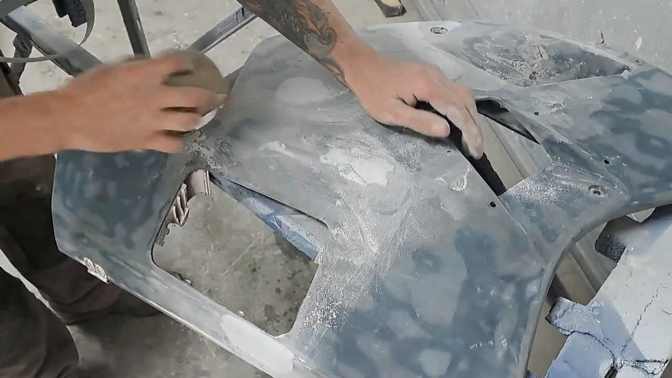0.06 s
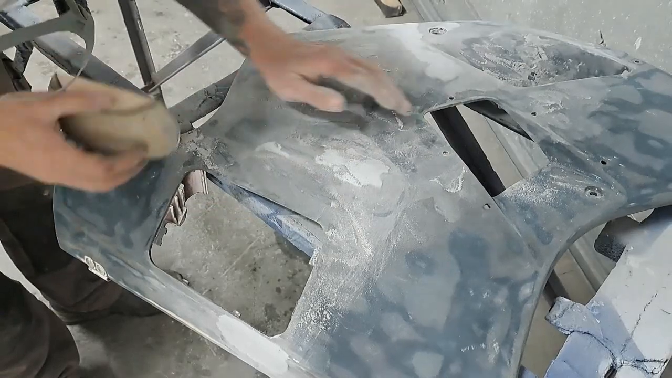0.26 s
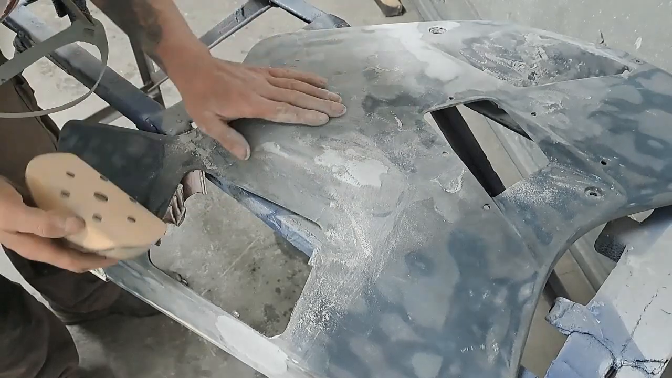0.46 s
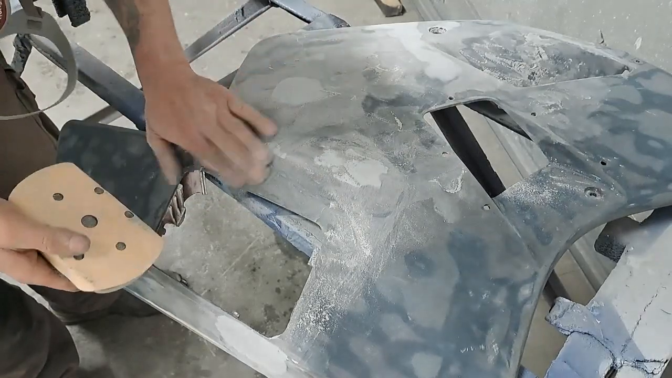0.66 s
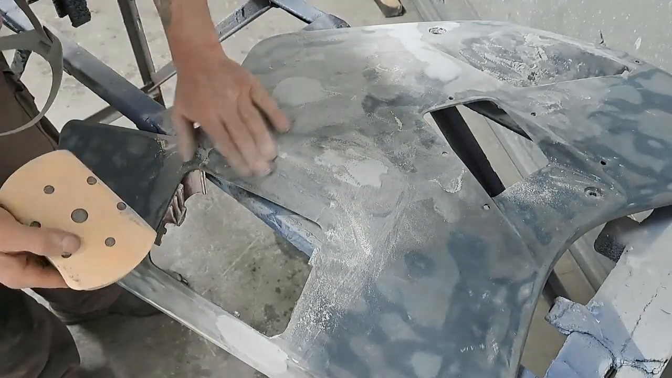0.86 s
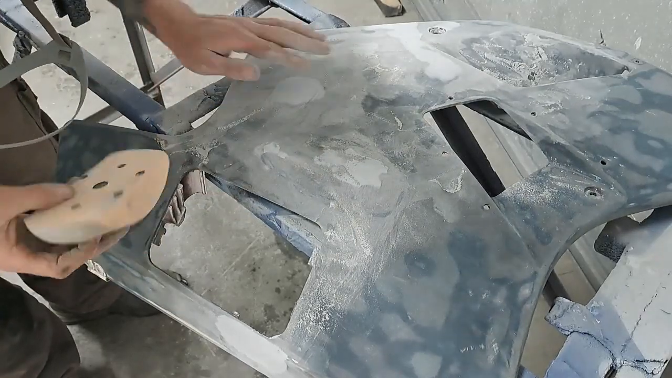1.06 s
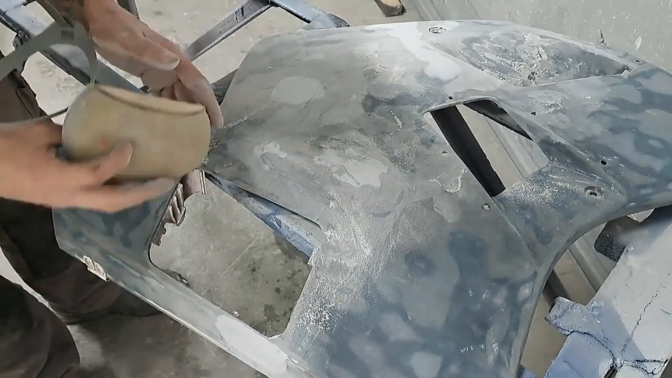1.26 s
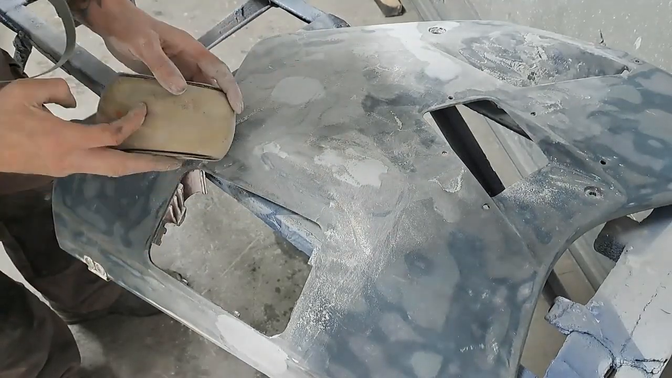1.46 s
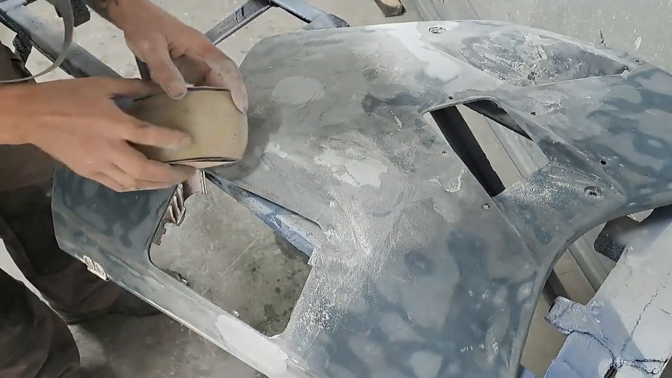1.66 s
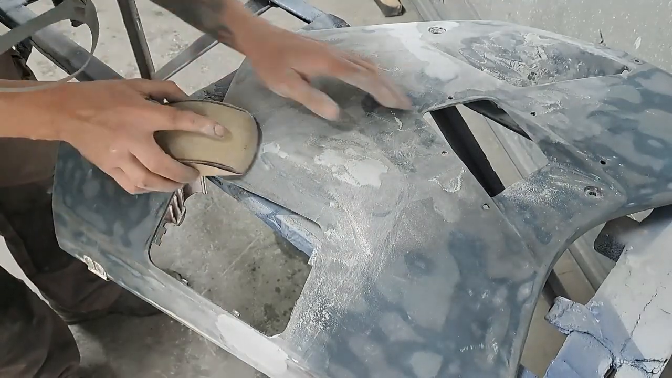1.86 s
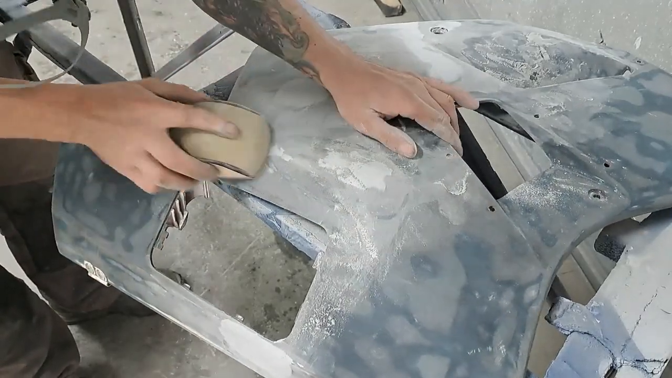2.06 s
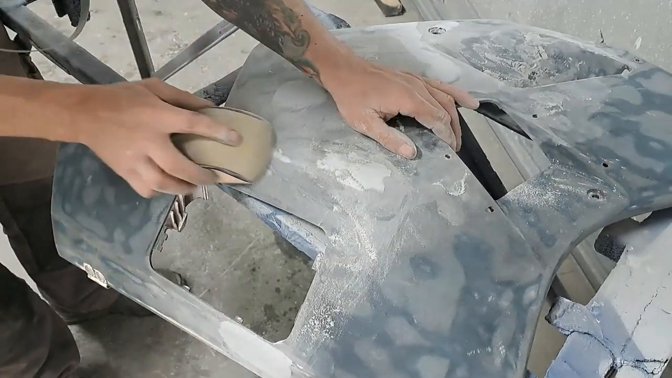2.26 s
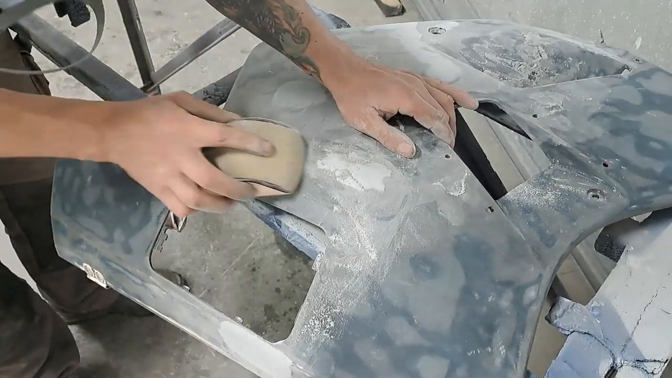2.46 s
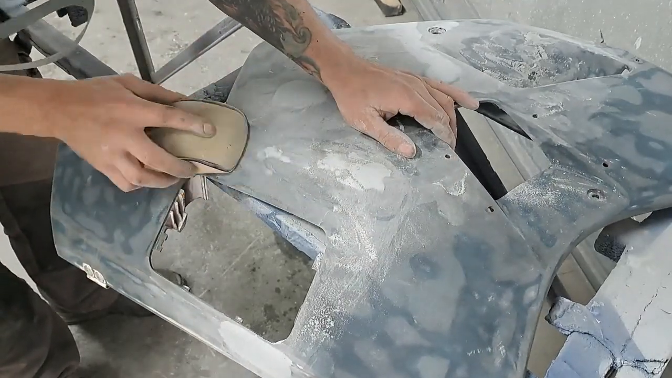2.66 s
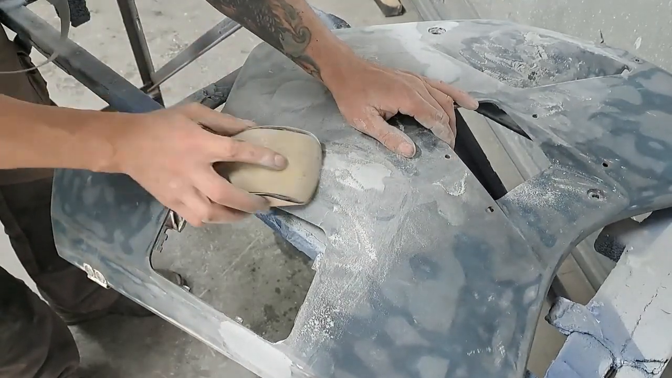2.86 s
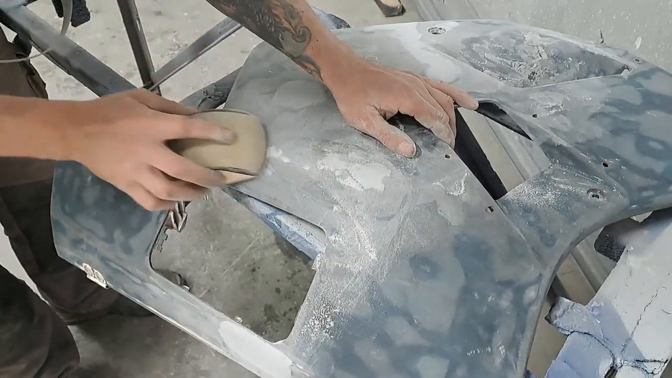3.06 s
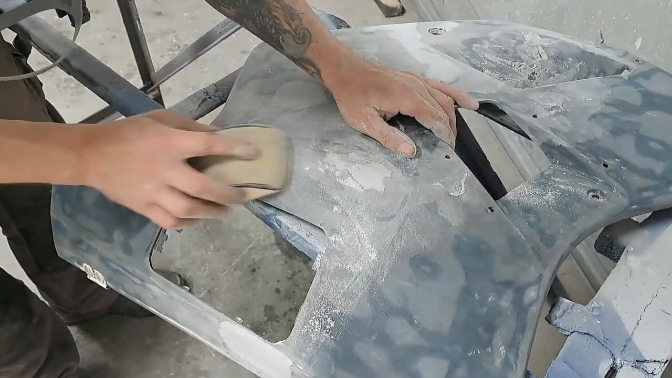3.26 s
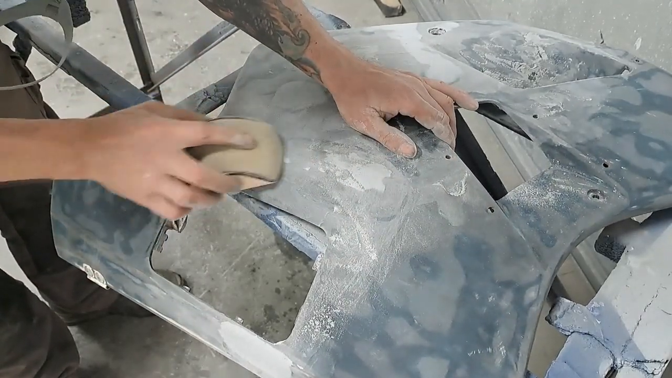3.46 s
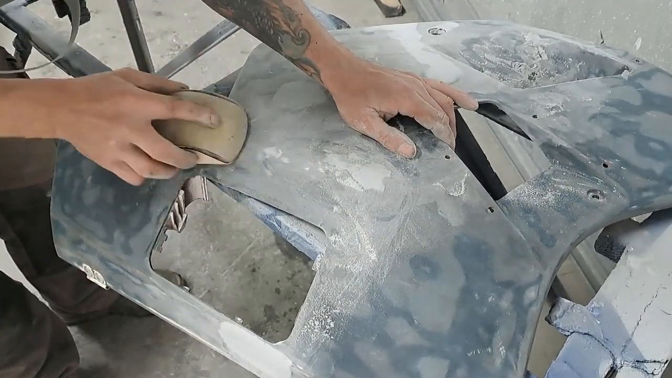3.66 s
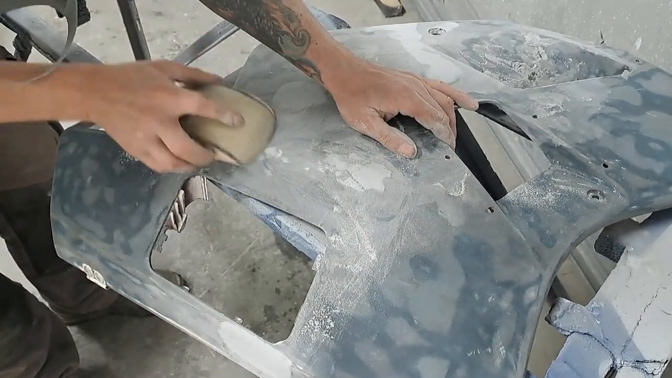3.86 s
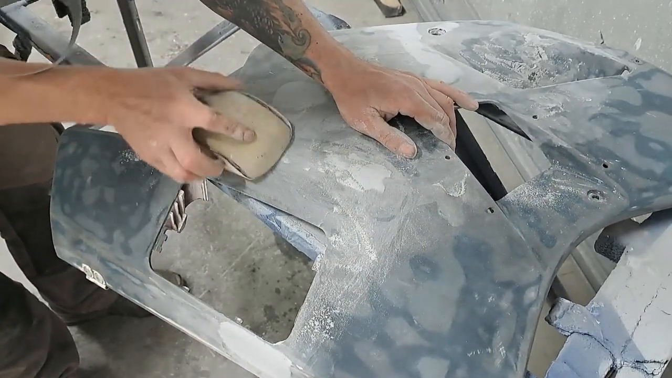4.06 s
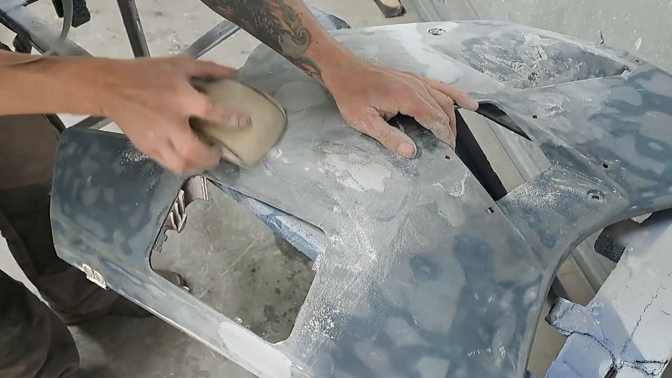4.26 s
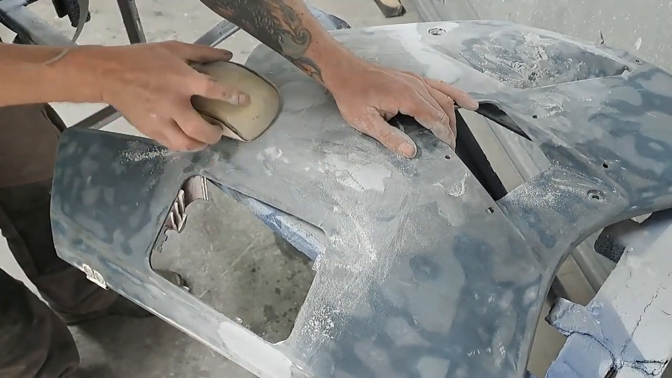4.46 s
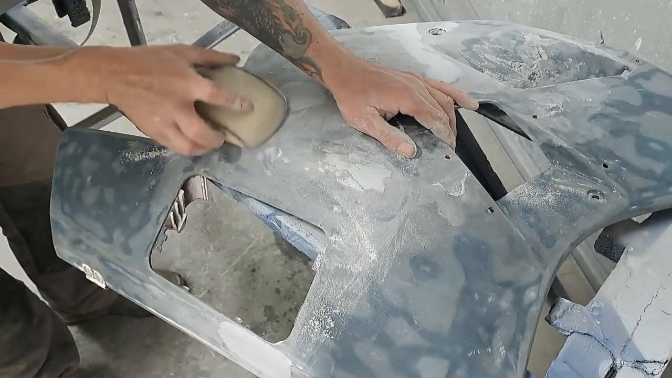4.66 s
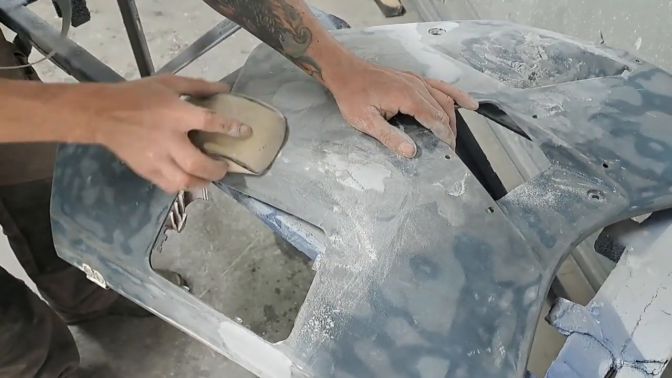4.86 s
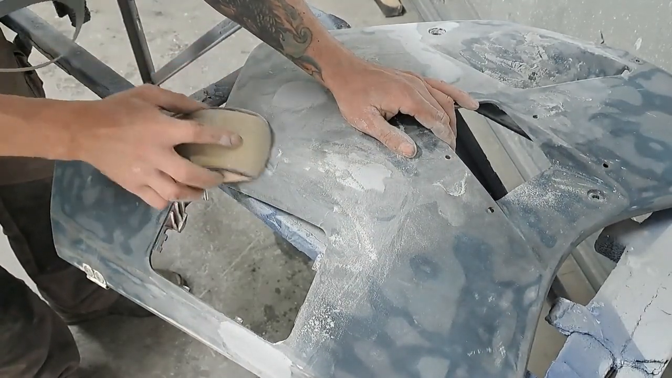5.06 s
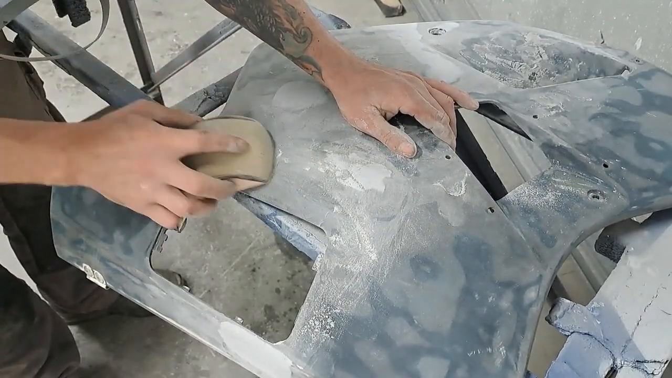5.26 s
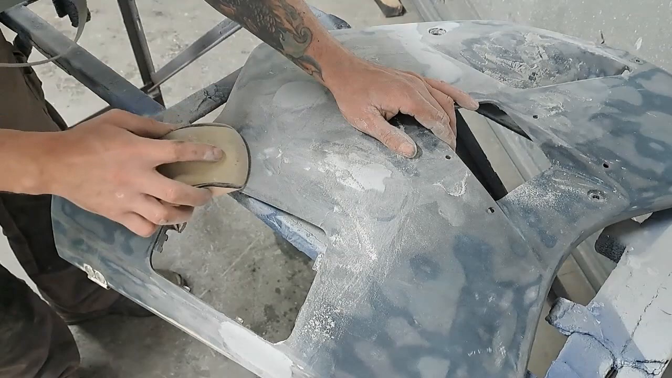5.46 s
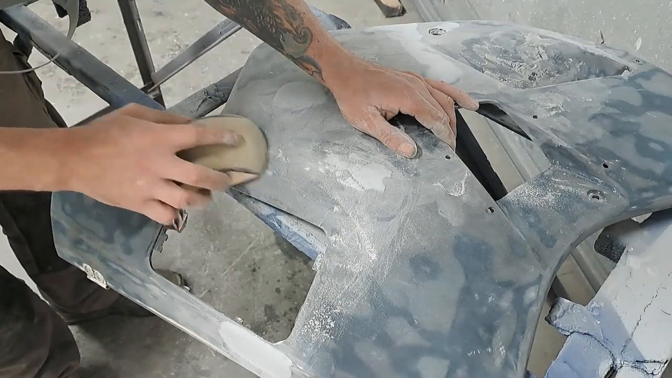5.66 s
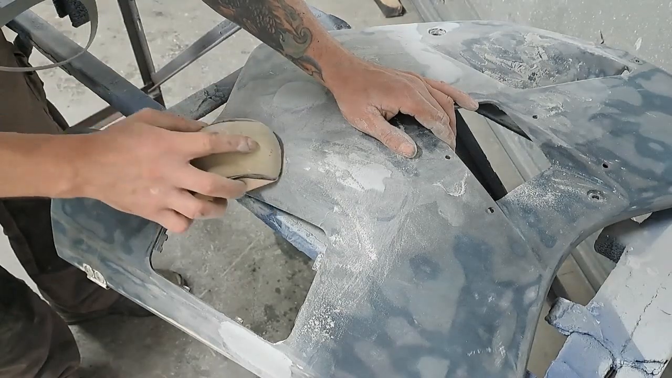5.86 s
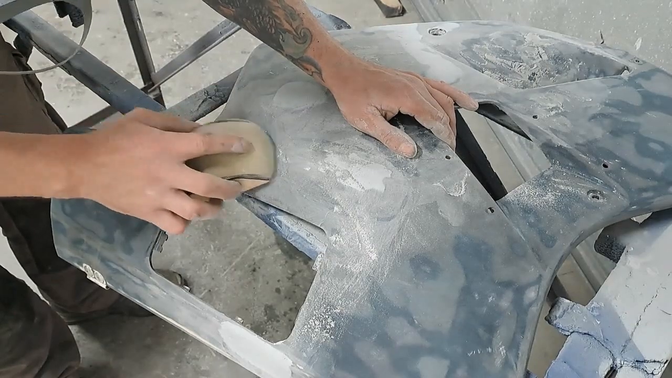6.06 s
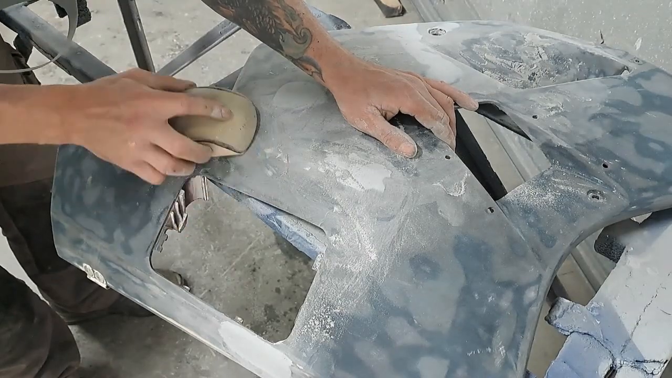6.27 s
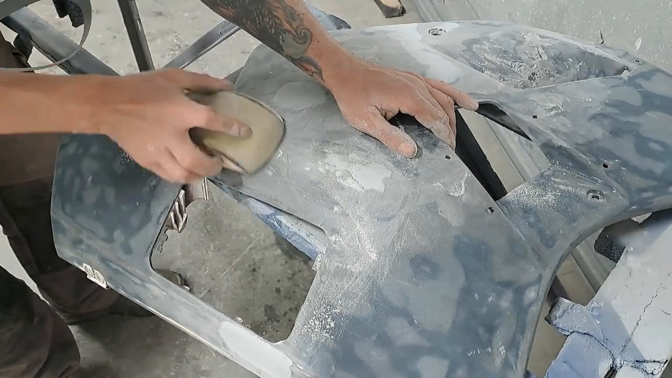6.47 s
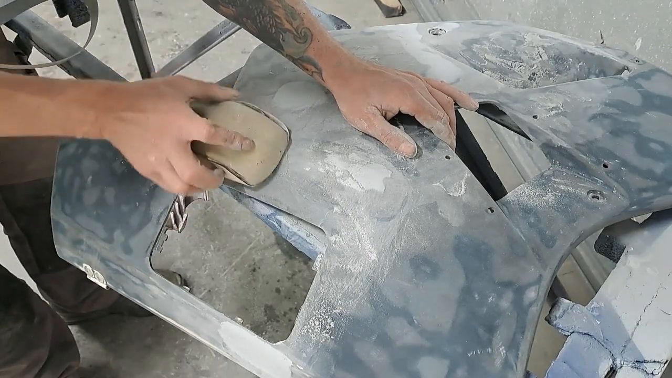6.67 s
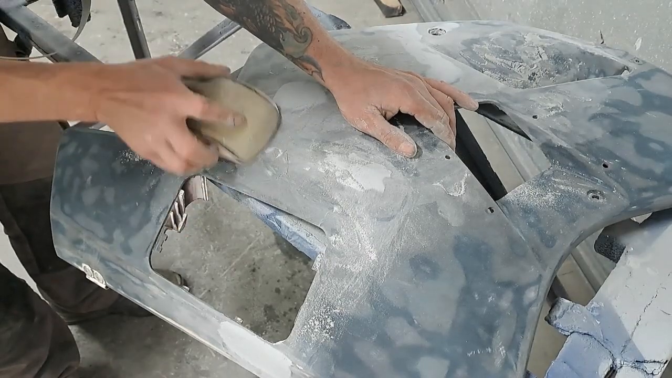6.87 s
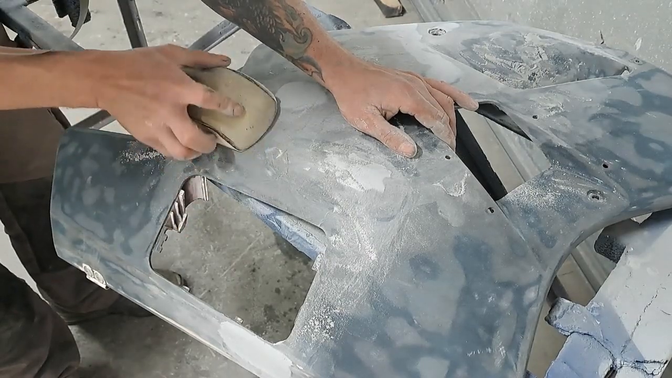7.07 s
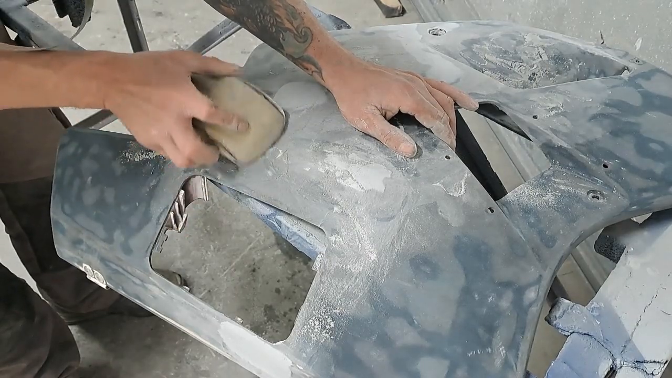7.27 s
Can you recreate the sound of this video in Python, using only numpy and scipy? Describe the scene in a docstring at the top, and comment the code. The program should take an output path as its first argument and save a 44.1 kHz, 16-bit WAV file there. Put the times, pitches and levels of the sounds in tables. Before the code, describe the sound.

A hand swishes across a dusty plastic bumper right at the start, followed by softer wipes up to about 1 second, with faint low bumps from the hollow part. Between 1.2 and 2 seconds, fingers make small dry scuffs on sandpaper and slide quietly into place. At about 2.1 seconds a padded sanding block lands with a dull, hollow thud and immediately begins rubbing back and forth, roughly seven strokes a second. The grit makes a bright, scratchy hiss that swells with each stroke and dulls at each turn. Around 5 seconds the sanding briefly eases with a soft bump, continues a little lighter, and grows stronger again from about 6.3 seconds, running on to the end just past 7 seconds. Underneath, the part rumbles and thumps softly on its stand. The sound is close and in stereo, in a quiet workshop with little echo.

```python
"""Sanding a plastic bumper.

A hand wipes off dust, sets down a padded block and sands at about seven strokes a second.
Grit scratches merge into a hiss that brightens as the block speeds up and dulls at each turn.
The hollow part rumbles on its stand and thuds as hand or block lands. Two close mics, quiet workshop."""
import sys
import numpy as np
from scipy import signal
from scipy.fft import rfft, irfft, next_fast_len
from scipy.io import wavfile
from scipy.ndimage import uniform_filter1d

SR = 44100
rng = np.random.default_rng(int(sys.argv[2]) if len(sys.argv) > 2 else 0)


def file_out(sig):
    """Save sig as 16-bit WAV at sys.argv[1]."""
    # one column per channel
    cols = np.atleast_2d(sig).T
    # limit, then scale
    lim = np.clip(cols, -1, 1)
    pcm = np.round(lim * 32767).astype(np.int16)
    wavfile.write(sys.argv[1], SR, pcm)


N = 322365
TIME_S = np.arange(N) / SR


def amp(db):
    return 10 ** (np.asarray(db) / 20)


def unit_rms(x):
    return x / np.sqrt(np.mean(x ** 2) + 1e-20)


def over_hz(table, hz):
    """Table columns interpolated over log frequency."""
    table_hz, *columns = np.transpose(table)
    return np.array([np.interp(np.log(hz + 1), np.log(table_hz + 1), c) for c in columns])


def add(mix, start_s, sound):
    """Mix a sound in at start_s."""
    part = mix[:, round(start_s * SR):][:, :sound.shape[-1]]
    part += sound[..., :part.shape[-1]]


def resonance(f, hz, width_hz):
    """Response of one damped mode."""
    return 1 / (1 + 1j * (f ** 2 - hz ** 2) / (width_hz * (f + 1)))


def swell_db(t, start_s, hold_s, rise_s, fade_s):
    """Rise, hold and fade, relative to the peak; rise_s and fade_s are per 10 dB."""
    return -10 * np.maximum(np.maximum((start_s - t) / rise_s, (t - start_s - hold_s) / fade_s), 0)


def block_contact(landing_s=2.105, settle_s=0.012):
    """Ramp from 0 to 1 as the block settles on the part."""
    return np.clip((TIME_S - landing_s) / settle_s + .5, 0, 1)


def reflect(x, wet_db, t60_s):
    """Dense reflections off bench and walls, different at each mic."""
    t = np.arange(SR // 3) / SR
    tail = rng.standard_normal((2, len(t))) * amp(-60 * t / t60_s) * (t > .002)
    tail *= amp(wet_db) / np.linalg.norm(tail, axis=1, keepdims=True)
    return (x + signal.fftconvolve(x, tail, axes=1)[:, :N]) / np.sqrt(1 + amp(wet_db) ** 2)


# Likeness of the two mics: (frequency [Hz], coherence [-1..1])
MIC_COHERENCE = [(60, 0.83), (250, 0.79), (640, 0.53), (1400, 0.22), (3000, -0.045), (15000, 0.16)]

def noise(gain):
    """Unit-rms stereo noise with spectrum gain(hz), alike at both mics in the bass."""
    size = next_fast_len(N)
    hz = np.fft.rfftfreq(size, 1 / SR)
    left, independent = rfft(rng.standard_normal((2, size)))
    coherence = np.clip(over_hz(MIC_COHERENCE, hz)[0], -1, 1)
    right = coherence * left + np.sqrt(1 - coherence ** 2) * independent
    return unit_rms(irfft(np.array([left, right]) * gain(hz), size)[:, :N])


# Room tone: (frequency [Hz], gain [dB])
AIR_SPECTRUM = [(20, -23), (55, 6.5), (100, -20), (210, -9.5), (320, -15), (600, -19), (1500, -29),
                (5000, -33), (15000, -31)]

def workshop():
    """Still room air."""
    return amp(-71.5) * noise(lambda f: amp(over_hz(AIR_SPECTRUM, f)))


def swing(modes):
    """Low modes swinging at random, held near unit rms."""
    motion = noise(lambda f: sum(amp(db) * abs(resonance(f, hz, width)) ** 2 for hz, width, db in modes))
    return motion / np.sqrt(uniform_filter1d((motion ** 2).mean(0), size=2600))


# Part rocking on its stand: (frequency [Hz], width [Hz], gain [dB])
ROCKING_MODES = [(56, 25, 0), (76, 22, -8)]
# Panel bending: (frequency [Hz], width [Hz], gain [dB])
PANEL_MODES = [(106, 14, -6), (127.5, 12, 2.5), (177, 18, -12), (209, 22, -10)]
# Shaking from block drag, less as the hand eases off: (time [s], level [dB])
DRAG_LEVELS = [(2.1, -63), (3.6, -63), (4.4, -66), (5.3, -69), (6.5, -72), (7.3, -67)]
# Give under a lean or hard turn: (time [s], hold [s], rocking [dB], panel [dB])
PART_FLEXES = [(.06, .06, -52, -53), (.38, .1, -54, -55), (.8, .1, -56, -55), (.96, .08, -53, -57),
               (1.1, .2, -73, -70), (1.66, .06, -67, -66), (1.87, .05, -59, -57), (2.125, .07, -43, -54),
               (2.22, .05, -56, -55), (2.35, .06, -55, -54), (2.5, .03, -55, -61), (2.6, .05, -55, -58),
               (3.04, .09, -51, -50), (3.27, .05, -60, -53), (3.37, .03, -54, -56), (3.44, .1, -58, -54),
               (3.86, .04, -56, -61), (3.97, .19, -58, -58), (4.4, .03, -63, -55), (4.55, .04, -61, -61),
               (4.66, .03, -68, -56), (4.78, .03, -62, -56), (4.99, .06, -60, -50), (5.1, 0.1, -59, -56),
               (5.41, .1, -61, -57), (5.7, .03, -58, -54), (5.84, .03, -59, -62), (5.94, .08, -57, -60),
               (6.36, .04, -63, -67), (6.75, .05, -56, -55), (6.95, .14, -63, -60), (7.17, .1, -63, -58)]

def rumble(rocking_drag_db, panel_drag_db):
    """Each flex rocks the part and bends its panel; block drag keeps both stirring."""
    drag = amp(np.interp(TIME_S, *np.transpose(DRAG_LEVELS))) * block_contact()
    rocking, panel = drag * amp(rocking_drag_db), drag * amp(panel_drag_db)
    for start_s, hold_s, rocking_db, panel_db in PART_FLEXES:
        push = amp(swell_db(TIME_S, start_s, hold_s, rise_s=0.025, fade_s=0.055))
        rocking = np.maximum(rocking, push * amp(rocking_db))
        panel = np.maximum(panel, push * amp(panel_db))
    return (rocking * swing(ROCKING_MODES) + panel * swing(PANEL_MODES)) * amp([[-2.3], [.7]])


# Plastic shell: (frequency [Hz], gain [dB], t60 [s])
SHELL_MODES = [(53, -20, 0.3), (78, -6.5, 0.15), (107, -0.5, 0.2), (174, -2.5, 0.2), (210, -2, 0.2),
               (250, -5, 0.18), (304, -5.5, 0.21), (360, -10, 0.35), (408, 2, 0.2), (455, -5, 0.33),
               (514, 3.5, 0.1), (579, 4.5, 0.085), (640, 1.5, 0.15), (721, 1, 0.17), (825, -2, 0.2),
               (888, -1, 0.18), (976, 8.5, 0.047), (1100, -9, 0.08), (1345, 12, 0.03)]
# Hand and block landing: (time [s], level [dB], cutoff [Hz])
BLOWS = [(.356, -42.5, 430), (0.38, -39.5, 330), (0.42, -41, 180), (.798, -44.5, 290), (.849, -47, 150),
         (1.872, -48, 220), (1.895, -49.5, 240), (2.107, -22.5, 530), (2.126, -31.5, 400),
         (2.143, -27.5, 150), (2.16, -33, 700), (2.183, -37, 280), (3.049, -40, 270), (3.435, -43, 270),
         (3.521, -46, 250), (4.98, -42, 290), (5.413, -49, 650)]

def knocks(push_gain, wet_db):
    """A blow gives one low push and rings the shell; softer contact excites fewer high modes."""
    out, t = np.zeros((2, N)), np.arange(SR // 2) / SR
    for start_s, db, cutoff_hz in BLOWS:
        ring = np.zeros_like(t)
        for k, (hz, mode_db, t60_s) in enumerate(SHELL_MODES):
            mode = amp(mode_db - 60 * t / t60_s) * np.sin(2 * np.pi * hz * t)
            ring += (-1) ** k * mode / np.hypot(1, (hz / cutoff_hz) ** 2)
        phase = 2 * np.pi * cutoff_hz * t
        push = phase ** 2 * (1 - phase / np.pi) * np.exp(-phase)
        add(out, start_s, amp(db) * (ring / abs(ring).max() + push_gain * push / push.max()))
    return reflect(out, wet_db, t60_s=0.25) * amp([[-1], [1]])


def shell_rasp(base_db, growth, highpass_hz):
    """Scraping drives the shell modes: a hollow undertone that swells slightly with speed."""
    def response(f):
        modes = sum((-1) ** k * amp(db) * resonance(f, hz, np.log(1000) / (np.pi * t60_s))
                    for k, (hz, db, t60_s) in enumerate(SHELL_MODES))
        return modes * f ** 3 / (f ** 3 + highpass_hz ** 3)  # fine grit barely moves the low modes
    drive_db, _ = stroke_motion(TIME_S)
    contact = block_contact()
    excess_db = drive_db - np.average(drive_db, weights=contact)
    return noise(response) * amp(base_db + growth * excess_db) * contact


# Fingers catching the paper: (time [s], level [dB], t60 [s])
PAPER_CATCHES = [(1.208, -64, .04), (1.291, -61.5, .09), (1.354, -53.5, 0.08), (1.703, -54, .16),
                 (1.897, -54, .09)]

def paper_ticks():
    """Short dry scuffs of the paper's edge."""
    envelope, t = np.zeros((1, N)), np.arange(SR // 4) / SR
    for start_s, db, t60_s in PAPER_CATCHES:
        add(envelope, start_s, amp(db - 60 * t / t60_s))
    return envelope * noise(lambda f: amp(over_hz(GRIT_SPECTRUM, f)))


# Skin and pad drags: (time [s], length [s], centre [Hz], width [Hz], level [dB])
SHORT_DRAGS = [(0.258, 0.085, 380, 450, -58), (1.735, 0.1, 700, 800, -58.5), (1.85, 0.084, 380, 450, -56),
               (2.042, 0.042, 1630, 130, -49), (2.076, .04, 700, 450, -46), (2.268, 0.055, 1940, 600, -47),
               (2.493, 0.12, 3900, 1700, -41), (4.664, 0.055, 1700, 350, -50), (4.98, .07, 550, 700, -50),
               (5.375, 0.056, 2000, 450, -50)]

def scuffs():
    """Each short drag swells and fades in one noise band."""
    out = np.zeros((2, N))
    for start_s, length_s, hz, width_hz, db in SHORT_DRAGS:
        swell = np.sin(np.pi * np.clip((TIME_S - start_s) / length_s, 0, 1))
        out += amp(db) * swell * noise(lambda f: abs(resonance(f, hz, width_hz)) ** 2)
    return out * amp([[-2], [1.5]])


# Bite, a tilt toward the treble: (frequency [Hz], gain per bite [dB/dB])
BITE_TILT = [(1500, -0.87), (5000, -0.32), (10000, 0.76), (15000, 0.99)]

def rub(motion, spectrum, growth, base_db, flutter_db, patch_db):
    """Friction hiss: motion sets level and tilt; the changing contact patch shifts the colour."""
    hiss = noise(lambda f: amp(over_hz(spectrum, f)))
    hz, t, frames = signal.stft(hiss, SR, nperseg=256, noverlap=192)
    drive_db, bite_db = motion(t)
    motion_db = over_hz(growth, hz).T * (drive_db - base_db) + over_hz(BITE_TILT, hz).T * bite_db
    flutter = unit_rms(uniform_filter1d(rng.standard_normal(len(t)), size=8))
    patches = uniform_filter1d(rng.standard_normal((len(t), len(hz))), size=48, axis=0)
    patches = unit_rms(uniform_filter1d(patches, size=8, axis=1)).T
    frames *= amp(base_db + motion_db + flutter_db * flutter + patch_db * patches)
    return signal.istft(frames, SR, nperseg=256, noverlap=192)[1][:, :N]


# Palm wipes, then fingers and pad sliding into place:
# (at speed [s], hold [s], rise [s/10 dB], fade [s/10 dB], drive [dB], bite [dB])
HAND_SWEEPS = [(.046, .052, .045, .055, -26, 5.5), (.43, .04, .055, .22, -48.5, -3.5),
               (.72, .05, .14, .065, -39, 0), (.945, .095, .047, .055, -38, 1), (1.18, .05, .1, .1, -70, 0),
               (1.356, .05, .004, .1, -57.5, -1.5), (1.45, .04, .055, .085, -49.5, -3),
               (1.78, .04, .055, .09, -51.5, -2.5), (1.965, .14, .055, .1, -42.5, -3.5)]

def wipe_motion(t, dulling_db_per_db=0.24):
    """Drive and bite [dB] of overlapping sweeps, each brightest at its fastest."""
    power, weighted_bite = 1e-12, 0
    for start_s, hold_s, rise_s, fade_s, drive_db, bite_db in HAND_SWEEPS:
        envelope_db = swell_db(t, start_s, hold_s, rise_s, fade_s)
        sweep_power = amp(drive_db + envelope_db) ** 2
        power += sweep_power
        weighted_bite += sweep_power * (bite_db + dulling_db_per_db * envelope_db)
    return 10 * np.log10(power), weighted_bite / power


# Skin on dusty plastic: (frequency [Hz], left [dB], right [dB])
SKIN_SPECTRUM = [(250, -10.5, -4.5), (580, -9, -7.5), (1000, -10, -6), (2040, -7.5, -0.5),
                 (3370, -5.5, -2.5), (4730, -5.5, 3), (7200, -3.5, 4), (8700, -2.5, -10.5),
                 (9600, -3.5, -7), (12600, -1, 1.5), (15900, -7, -7.5)]
# Growth with speed: (frequency [Hz], gain per drive [dB/dB])
SKIN_SLOPES = [(250, 0.76), (1000, 1.1), (4000, 1.014), (12000, 0.92)]

def wiping():
    """The palm sweeps dust away and the fingers settle on the paper, until the block lands."""
    hiss = rub(wipe_motion, SKIN_SPECTRUM, SKIN_SLOPES, base_db=-43, flutter_db=0.8, patch_db=1.07)
    return hiss * np.sqrt(1 - block_contact())


# Strokes, turn to turn: (turn [s], fastest [s], drive at turn [dB], drive at fastest [dB], bite [dB])
BLOCK_STROKES = [(2.079, 2.19, -40.5, -31.5, -1.5), (2.27, 2.377, -39.5, -34.0, 1),
                 (2.426, 2.521, -41.5, -31.0, -1.5), (2.619, 2.714, -37.5, -31.5, 1.0),
                 (2.765, 2.843, -40.0, -30.5, 0), (2.952, 3.039, -36.0, -26.5, 1),
                 (3.105, 3.179, -35.0, -28.5, 1.0), (3.291, 3.395, -38.0, -28.0, 0.5),
                 (3.466, 3.52, -38.0, -30.0, 1.0), (3.613, 3.693, -42.0, -35.5, 1.0),
                 (3.755, 3.809, -42.5, -34.0, 0.5), (3.893, 3.974, -42.0, -32.0, 0.0),
                 (4.02, 4.078, -38.0, -30.0, 0.5), (4.174, 4.239, -41.5, -33.5, 1),
                 (4.288, 4.342, -40.0, -30.5, 0.0), (4.44, 4.493, -40.0, -33.5, 1.0),
                 (4.547, 4.595, -40.0, -31.0, 1.5), (4.694, 4.761, -39.5, -33.0, -0.5),
                 (4.791, 4.85, -38.0, -29.5, 1.5), (4.958, 4.992, -47.5, -41.0, 0.0),
                 (5.099, 5.178, -51.5, -37.5, 2.5), (5.26, 5.339, -46.5, -35.5, 0.5),
                 (5.41, 5.46, -43.0, -36.5, 1.5), (5.542, 5.623, -45.0, -33.0, -2.0),
                 (5.697, 5.755, -39.5, -36.5, -0.5), (5.817, 5.894, -44.0, -37.0, -1.0),
                 (5.95, 6.022, -45.0, -39.0, 0.0), (6.079, 6.132, -47.5, -37.5, 0.5),
                 (6.242, 6.327, -46.5, -33.5, 0.5), (6.371, 6.427, -39.0, -30.0, 0.5),
                 (6.524, 6.598, -41.0, -35.0, 0.0), (6.641, 6.684, -41.0, -30.0, 2),
                 (6.79, 6.852, -40.0, -35.0, 0.0), (6.9, 6.96, -41.5, -33.0, 0.5),
                 (7.039, 7.115, -41.0, -37, -0.5), (7.16, 7.217, -44.0, -35.0, -0.5)]

def stroke_motion(t, last_turn_s=7.31, grip_exponent=1.9, glide_exponent=2.2, grip_bite_db=0.6):
    """Drive and bite [dB] of the block: grit bites while speeding up, glides while slowing."""
    turn_s, fastest_s, turn_db, fastest_db, bite_db = np.transpose(BLOCK_STROKES)
    marks_s = np.append(np.column_stack([turn_s, fastest_s]), last_turn_s)
    phase = np.interp(t, marks_s, np.arange(len(marks_s)) * np.pi / 2)
    speed, acceleration = abs(np.sin(phase)), np.sin(2 * phase)
    blend = speed ** np.where(acceleration > 0, grip_exponent, glide_exponent)
    slow, fast = amp(np.interp(t, turn_s, turn_db)), amp(np.interp(t, fastest_s, fastest_db))
    drive = (1 - blend) * slow + blend * fast
    return 20 * np.log10(drive), np.interp(t, fastest_s, bite_db) + grip_bite_db * acceleration


# Grit on plastic: (frequency [Hz], left [dB], right [dB])
GRIT_SPECTRUM = [(237, -19.5, -17), (590, -12, -10), (970, -17, -12), (1340, -12, -8), (2020, -9, -2.5),
                 (3330, -11, -7.5), (5060, -10, -1.5), (6070, -12.5, -3.5), (6820, -9, -0.2),
                 (7450, -8.5, -4.5), (8900, -10.5, -20.5), (9500, -10.5, -15), (12550, -9, -7.5),
                 (16600, -16.5, -17)]
# Fine scratches grow fastest with speed: (frequency [Hz], gain per drive [dB/dB])
GRIT_SLOPES = [(250, 0.09), (1000, 0.51), (3000, 0.65), (7000, 1.05), (12000, 1.31)]

def sanding():
    """The block drags its grit back and forth; speed lifts the treble most."""
    hiss = rub(stroke_motion, GRIT_SPECTRUM, GRIT_SLOPES, base_db=-36, flutter_db=0.85, patch_db=1)
    return hiss * np.sqrt(block_contact())


def scene():
    """Friction with reflections, the part's rumble and thuds, room tone."""
    friction = sanding() + wiping() + paper_ticks() + scuffs()
    friction += shell_rasp(base_db=-59.7, growth=0.26, highpass_hz=540)
    body = rumble(rocking_drag_db=-2.5, panel_drag_db=-.4) + knocks(push_gain=0.55, wet_db=-7.0)
    return reflect(friction, wet_db=-11, t60_s=0.12) + body + workshop()


def record(dry):
    """Recorder band limit."""
    cutoff_hz = 15780
    lowpass = signal.firwin(701, cutoff_hz, window=("kaiser", 8), fs=SR)
    return signal.oaconvolve(dry, lowpass[None], "same")


dry = scene()
out = record(dry)
file_out(out)
```